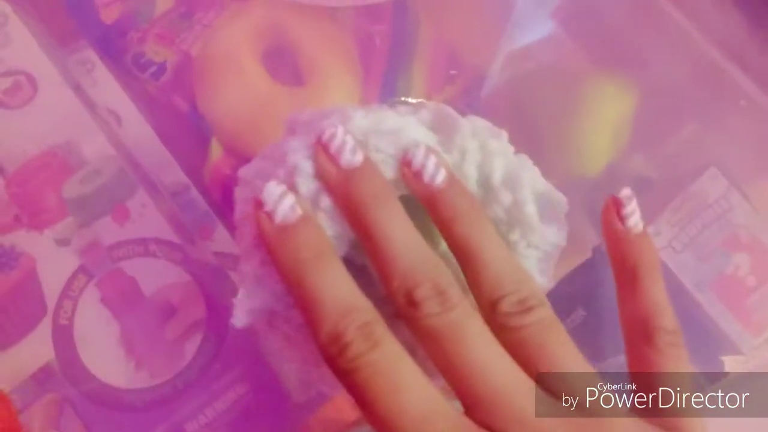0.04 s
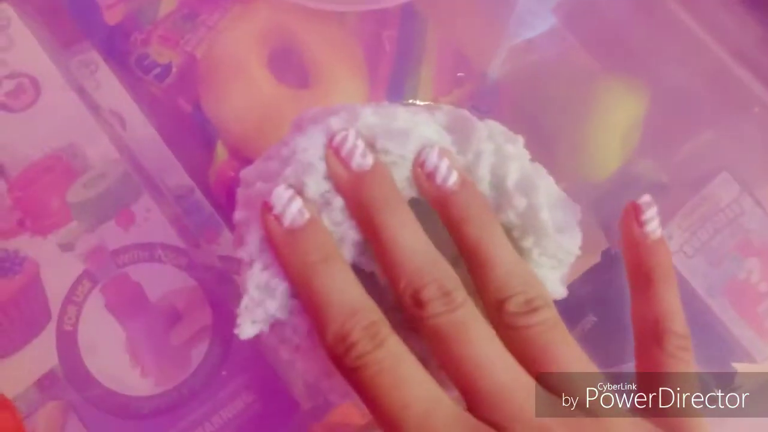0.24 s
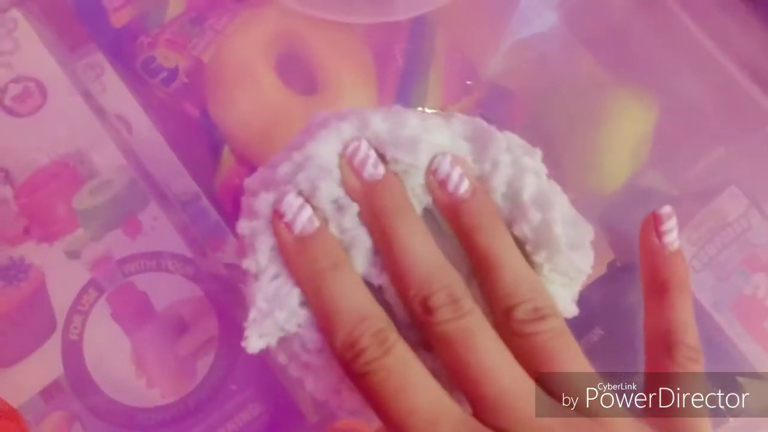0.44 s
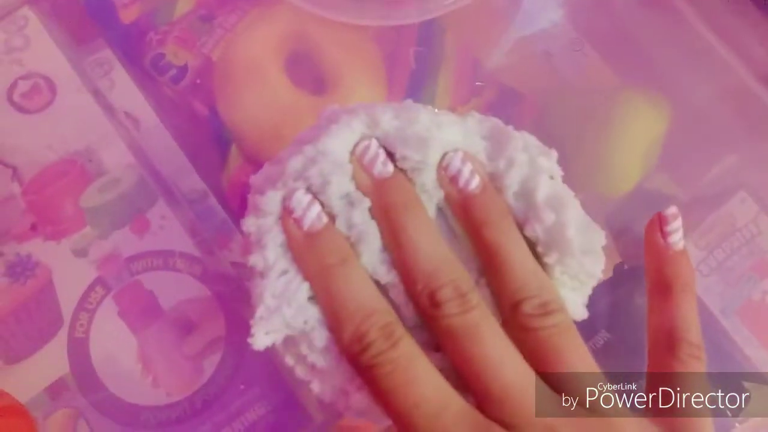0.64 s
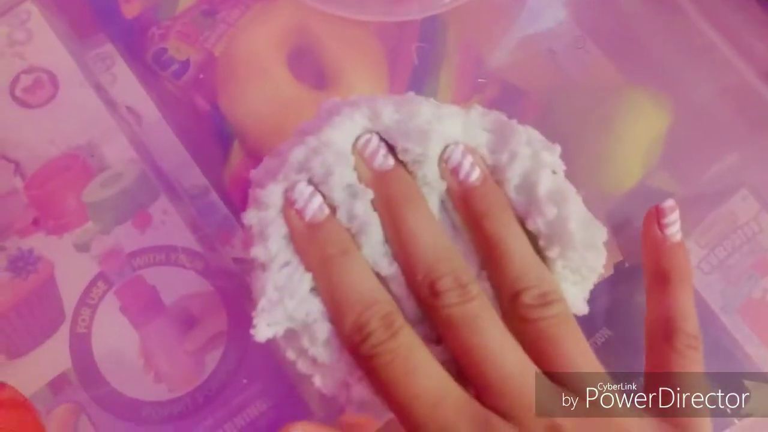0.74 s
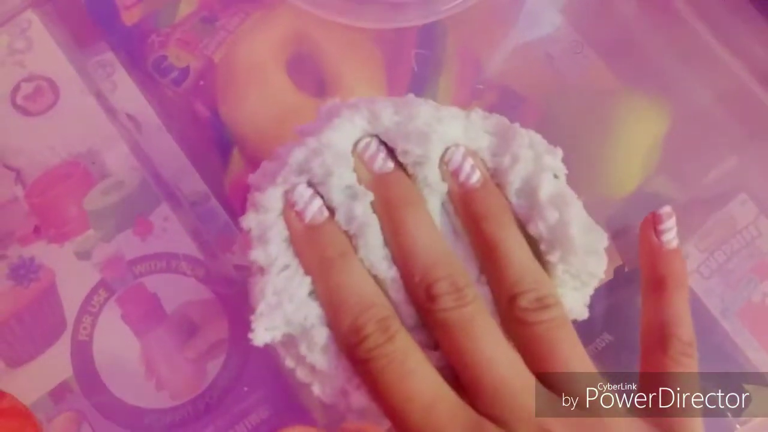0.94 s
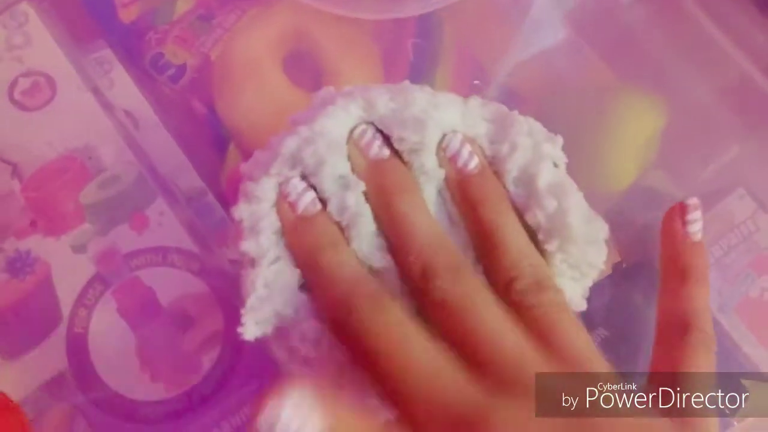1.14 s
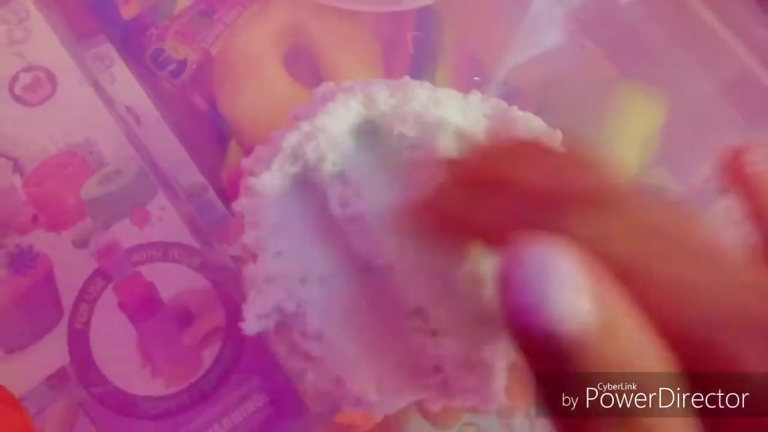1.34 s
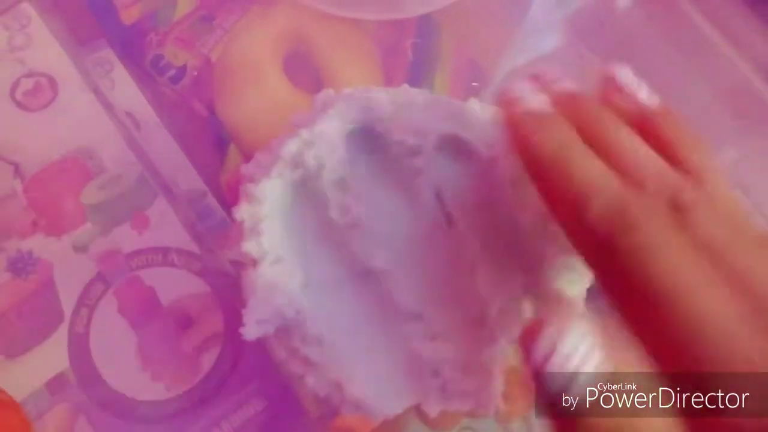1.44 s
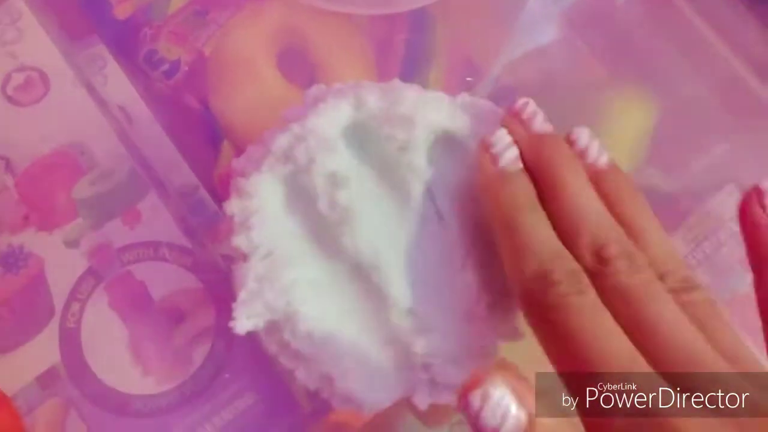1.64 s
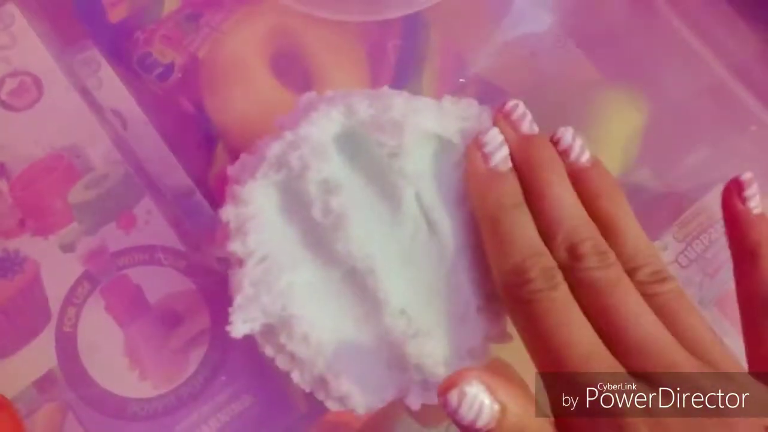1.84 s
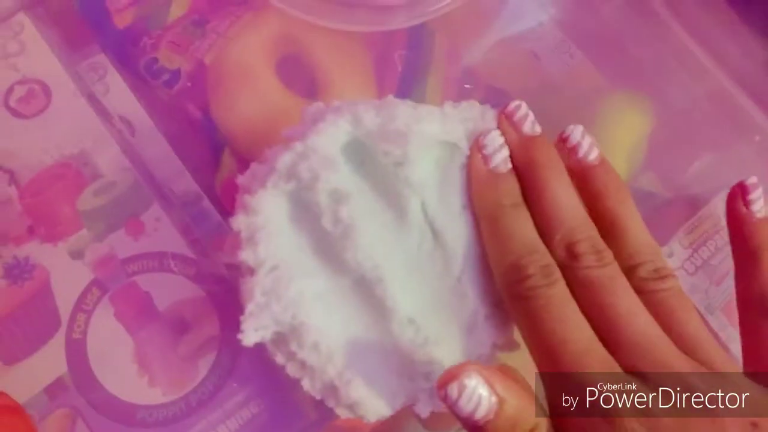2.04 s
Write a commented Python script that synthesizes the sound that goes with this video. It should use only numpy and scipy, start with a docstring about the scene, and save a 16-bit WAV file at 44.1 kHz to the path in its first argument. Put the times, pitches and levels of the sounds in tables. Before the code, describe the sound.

Crunchy slime under fingertips, very close in a small quiet room: faint ticks, a loud cluster of pops with a hollow table knock, then wet fizzing presses and sparse crackles, heard on a phone microphone.

```python
"""Crunchy slime on a table

Fingertips press a lump of slime in a small quiet room, close to a phone. Trapped bubbles pop and fizz
as filtered noise bursts and grains. Short damped sines follow the press: air pockets plop low, and one
bright high tick sharpens a pop. The fingers knock the table top into ringing through the slime, and
lean and slide on it with a low rumble and a wet squelch."""
import sys
import numpy as np
from scipy import signal
from scipy.fft import rfft, irfft, next_fast_len
from scipy.io import wavfile
from scipy.ndimage import map_coordinates

SR = 44100
rng = np.random.default_rng(int(sys.argv[2]) if len(sys.argv) > 2 else 0)


def persist_wave(psi):
    """Save psi, clipped to +-1, as 16-bit WAV."""
    counts = np.round(np.clip(psi, -1, 1) * 32767).astype(np.int16)
    wavfile.write(sys.argv[1], SR, np.atleast_2d(counts).T)


N = 92610
T = np.arange(N) / SR  # seconds


def amp(db):
    """Decibels to linear amplitude."""
    return 10 ** (np.asarray(db) / 20)


def unit(x):
    """Scale x to an rms of 1."""
    return x / np.sqrt(np.mean(x ** 2) + 1e-20)


def along(points, hz):
    """Interpolate (Hz, value) points on a log frequency axis."""
    f, v = np.transpose(points)
    return np.interp(np.log(hz + 1), np.log(f + 1), v)


def curves(rows):
    """One value per sample for each column after the time."""
    seconds, *columns = np.transpose(rows)
    return [np.interp(T, seconds, column) for column in columns]


def wobble(rate):
    """A smooth random curve with this many knots a second."""
    knots = rng.standard_normal(int(N * rate / SR) + 4)
    return map_coordinates(knots, [T * rate])


def coloured(x, spectrum):
    """Pass x through a minimum-phase filter of unit energy, shaped by (Hz, dB) points."""
    size = 8192
    log_gain = np.log(amp(along(spectrum, np.fft.rfftfreq(size, 1 / SR))) + 1e-6)
    # folding the cepstrum onto positive time makes the filter causal
    cepstrum = irfft(log_gain)
    cepstrum[1:size // 2] *= 2
    cepstrum[size // 2 + 1:] = 0
    response = irfft(np.exp(rfft(cepstrum)))
    return signal.fftconvolve(x, response / np.linalg.norm(response))[:len(x)]


def cavity(x, spectrum):
    """Bubble noise in its own colour plus a hollow body, stronger while the cavities are deeper."""
    # Each row: time in seconds, drive of the hollow body against the bubble noise in dB.
    depth = [(.19, -28), (.21, -4), (.45, -1.5), (.6, -27), (1.15, -23.5), (1.18, -13.5), (1.42, -13.5),
             (1.5, -27), (1.64, -13.5)]
    # Hollow body's colour. Each row: frequency in Hz, relative level in dB per Hz.
    hollow = [(1700, -33), (2500, -0.5), (3800, -1), (4800, -36.5)]
    body = coloured(amp(curves(depth)[0]) * x, hollow)
    return coloured(x, spectrum) + body


def grains(per_s, spread_db, bed):
    """Random ticks of uneven size and either sign over a bed of steady noise, rms 1."""
    hit = rng.random(N) < per_s / SR
    size = np.minimum(rng.exponential(1, N), 4)
    noise = rng.standard_normal((2, N))
    ticks = unit(hit * amp(spread_db * size) * np.sign(noise[0]))
    return unit(ticks + bed * noise[1])


def fizz():
    """Countless small bubbles: a crackle of ticks and a finer wide hiss, unsteady in level."""
    # Each row: time in seconds, crackle level in dB, wide hiss over the crackle in dB.
    swells = [(0, -63.5, -11.5), (.3, -53, -31), (.56, -87.5, -8.5), (.62, -56, -11.5), (.67, -45, -1.5),
              (.74, -45, -2), (.76, -57, 0), (.79, -57, 9.5), (.81, -65.5, 2), (.92, -86.5, -1),
              (1.1, -104, -20), (1.115, -61.5, -29), (1.28, -55, -9.5), (1.45, -61, -27.5),
              (1.62, -69, -47.5), (1.66, -58, 2), (1.84, -77, -22), (1.88, -44, 0), (1.91, -43.5, -2.5),
              (1.96, -58.5, -0.5), (2.1, -93, -4.5)]
    # Crackle's colour. Each row: frequency in Hz, relative level in dB per Hz.
    crackle_colour = [(2500, -75), (4600, -30.5), (5300, -3.5), (5950, -5.5), (6900, -21.5), (10000, -66)]
    # Fine hiss's colour. Each row: frequency in Hz, relative level in dB per Hz.
    hiss_colour = [(2200, -46), (4000, 0), (7500, -0.5), (10400, -10), (12700, -28.5), (15300, -17.5)]
    level_db, hiss_db = curves(swells)
    crackle = unit(cavity(grains(per_s=1300, spread_db=4, bed=.45), crackle_colour))
    hiss = unit(coloured(grains(per_s=2500, spread_db=3, bed=.8), hiss_colour))
    return amp(level_db + 2.2 * wobble(70)) * (crackle + amp(hiss_db) * hiss)


def squelch():
    """Many wet pockets of random pitch and size, each a short damped ring, rms 1."""
    per_s, t60_s = 1800, .03
    u = rng.random((int(per_s * N / SR), 3))  # columns drive start, pitch and size
    t = T[:SR // 30]
    hz = 150 * 20 ** u[:, 1:2]  # 150 to 3000 Hz
    size = amp(-3 * np.log(u[:, 2:] + .02))
    onset = np.minimum(500 * t, 1)  # 2 ms
    ring = size * amp(-60 * t / t60_s) * onset * np.sin(2 * np.pi * hz * t)
    at = (u[:, :1] * N).astype(int) + np.arange(len(t))
    return unit(np.bincount(at.ravel(), ring.ravel(), N)[:N])


def lean():
    """The hand leans and slides: low noise carried by the table, squelch under the fingers."""
    # Each row: time in seconds, rumble level in dB, squelch level in dB.
    pressure = [(0, -45.5, -77.5), (.2, -48, -76.5), (.3, -39.5, -40.5), (.56, -54.5, -89.5),
                (.62, -39.5, -75), (.67, -41.5, -48.5), (.8, -39, -53), (.9, -51, -71), (1, -63.5, -82),
                (1.25, -51.5, -81.5), (1.48, -64, -83), (1.63, -70.5, -84), (1.7, -45, -49.5),
                (1.84, -58, -76), (1.89, -40.5, -49), (1.97, -40, -58), (2.02, -45, -73.5), (2.1, -53, -80)]
    # Table rumble's colour. Each row: frequency in Hz, relative level in dB per Hz.
    rumble_colour = [(20, -29.5), (60, 11), (150, -0.5), (260, -21.5), (500, -92)]
    # Squelch's colour. Each row: frequency in Hz, relative level in dB per Hz.
    rub_colour = [(150, -20), (300, 2), (520, -8.5), (900, -8.5), (1600, -17.5), (2300, -12), (3000, -45.5)]
    rumble_db, rub_db = curves(pressure)
    rumble = unit(coloured(rng.standard_normal(N), rumble_colour))
    rub = unit(coloured(squelch(), rub_colour))
    return amp(rumble_db + 3 * wobble(25)) * rumble + amp(rub_db + 3 * wobble(30)) * rub


def air():
    """Steady room and circuit hiss: coloured noise."""
    # Each row: frequency in Hz, relative level in dB per Hz.
    air_colour = [(200, -7), (16000, -9.5)]
    return amp(-80.5) * unit(coloured(rng.standard_normal(N), air_colour))


def pops():
    """Each single burst: a sharp tick and a quick puff of noise in the colour of the open cavity."""
    # Bubbles that burst singly. Each row: start in seconds, relative strength in dB.
    bursts = [(0.0382, -18.5), (0.0635, -18), (0.1132, -29.5), (0.1652, -31), (0.2125, -20), (0.2149, -5),
              (0.2212, -3), (0.2258, -5), (0.2448, -6), (0.3238, -26.5), (0.3739, -32), (0.383, -26),
              (.444, -36.5), (1.1797, -23.5), (1.2042, -18.5), (1.2257, -29.5), (1.2487, -23),
              (1.2534, -26.5), (1.2731, -26.5), (1.277, -26.5), (1.2973, -20), (1.334, -32.5),
              (1.366, -30.5), (1.3892, -28.5), (1.6387, -12.5), (1.784, -38.5), (1.8532, -27.5),
              (1.8775, -28)]
    # Open cavity's colour. Each row: frequency in Hz, relative level in dB per Hz.
    snap_colour = [(2500, -67), (4300, -8.5), (5600, 2), (8300, -20), (11000, -45), (15200, -42.5)]
    gain_db, tick_db = 2, -4.5  # on every burst; tick against the puff
    rise_s, t60_s = .0006, .014
    out, t = np.zeros(N + SR), T[:SR // 50]
    shape = (1 - np.exp(-t / rise_s)) * amp(-60 * t / t60_s)
    tick = amp(tick_db) * (np.arange(len(t)) == SR // 2000)  # half a millisecond in
    for s, db in bursts:
        puff = shape * rng.standard_normal(len(t))
        burst = puff / np.linalg.norm(puff) + tick
        out[round(s * SR):][:len(t)] += amp(db + gain_db) * burst
    return cavity(out[:N], snap_colour)


def knocks():
    """Fingers knock through the slime: a sine-squared push, as long as the contact, rings the table."""
    # Each row: start in seconds, strength of the push in dB, contact time in ms.
    pushes = [(0.2119, -12, 1.04), (.2165, -14, 2.7), (0.2237, -9, 4.3), (0.2247, -13.5, .25),
              (0.2365, -23.5, 0.93), (0.2448, -25, .25), (1.673, -29.5, 0.78), (1.685, -30.5, 2.85)]
    # Ringing modes of the table top. Each row: frequency in Hz, level in dB, 60 dB decay in seconds.
    modes = [(120.3, -5, .12), (160, -3, 0.033), (199, -2.5, 0.3), (346.3, -7, 0.088), (1800, 8, 0.0045)]
    push, t = np.zeros(N + SR), T[:SR // 3]
    for s, db, ms in pushes:
        shape = np.sin(np.pi * np.clip(t[:SR // 50] * 1000 / ms, 0, 1)) ** 2
        push[round(s * SR):][:len(shape)] -= amp(db) * shape / shape.sum()
    table_top = sum(amp(db - 60 * t / t60) * np.sin(2 * np.pi * hz * t) for hz, db, t60 in modes)
    return signal.fftconvolve(push, table_top)[:N]


def plops():
    """Short damped sines, longer when low: air pockets plop, and one high tick sharpens a pop."""
    # Each row: start in seconds, level before the decay in dB, pitch in Hz.
    # The row at 1.64 s is the bright tick on a pop; the others are air pockets.
    damped_sines = [(0.2155, 1, 634), (0.747, -30.5, 189), (.812, -36, 670), (.822, -39.5, 670),
                    (0.887, -45.5, 422), (1.076, -45, 604), (1.287, -51, 398.4), (1.387, -41.5, 199),
                    (1.389, -53, 596), (1.64, -33.5, 12240), (1.673, -23, 625), (1.786, -38, 1760),
                    (1.866, -43.5, 1280), (1.962, -29.5, 160), (1.997, -45.5, 613)]
    cycles = 10  # to fall by 60 dB
    out, t = np.zeros(N + SR), T[:SR // 10]
    for s, db, hz in damped_sines:
        onset = np.minimum(3 * t * hz, 1)  # a third of a cycle
        decay = amp(db - 60 * t * hz / cycles)
        out[round(s * SR):][:len(t)] -= decay * np.sin(2 * np.pi * hz * t) * onset
    return out[:N]


def room(x):
    """Noise tails whose frequencies die at their own speeds; three tails take turns every 30 ms."""
    # Each row: frequency in Hz, 60 dB decay in seconds.
    decay_times = [(100, 0.21), (6000, 0.13), (14000, 0.19)]
    out, zone = np.zeros(N), np.floor(T / .03) % 3
    for k in range(3):
        hz, t, z = signal.stft(rng.standard_normal(SR // 2), SR, nperseg=256)
        decay = amp(-60 * t / along(decay_times, hz)[:, None])
        tail = signal.istft(z * decay, SR, nperseg=256)[1]
        delayed = np.pad(x * (zone == k), (130, 0))  # about 3 ms
        out += signal.fftconvolve(delayed, tail / np.linalg.norm(tail))[:N]
    return out


def scene():
    """Bursts, damped sines and knocks with the room's answer, over fizz, rumble, squelch and hiss."""
    hits, wet = pops() + knocks(), plops()
    answer = room(amp(-8) * hits + amp(-9) * wet)
    return (hits + wet + answer + fizz() + lean() + air())[None]


def record(dry):
    """The phone's microphone drops the deepest bass and keeps nothing above its band limit."""
    low_hz, top_hz = 55, 16250
    m = next_fast_len(N + SR // 2)
    hz = np.fft.rfftfreq(m, 1 / SR)
    s = 1j * hz / low_hz
    bass_cut = (s * s / (s * s + 1.8 * s + 1)) ** 2  # two second-order high-passes
    return irfft(rfft(dry, m) * bass_cut * (hz < top_hz), m)[..., :N]


dry = scene()
out = record(dry)
persist_wave(out)
```